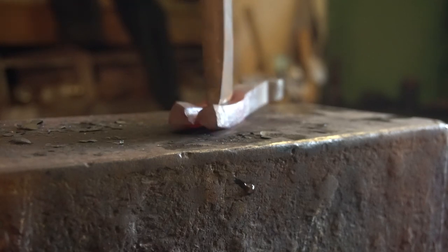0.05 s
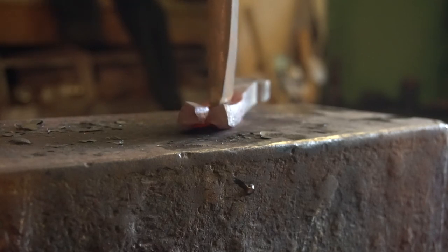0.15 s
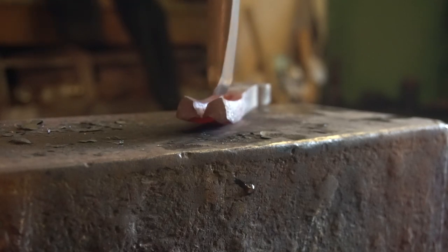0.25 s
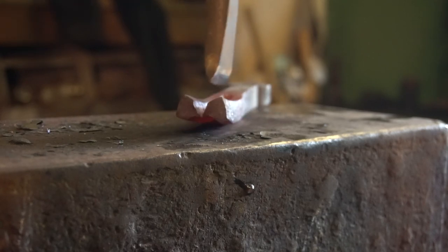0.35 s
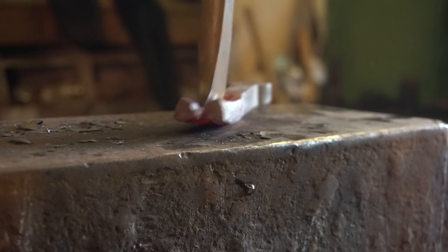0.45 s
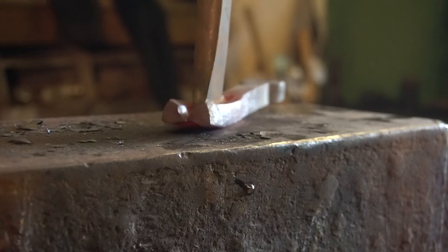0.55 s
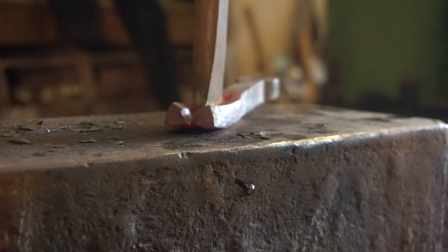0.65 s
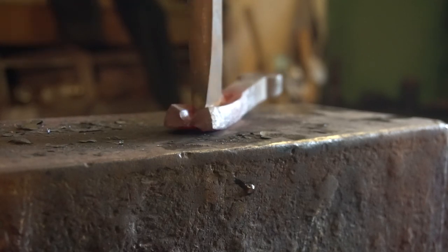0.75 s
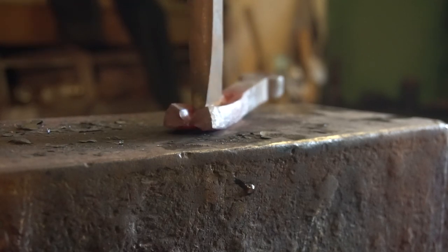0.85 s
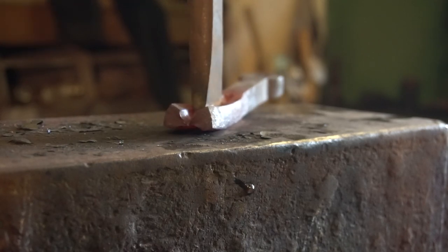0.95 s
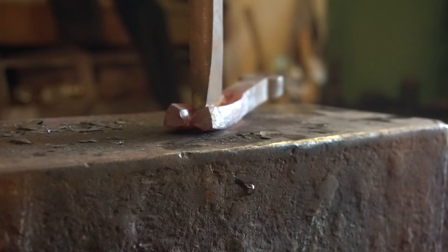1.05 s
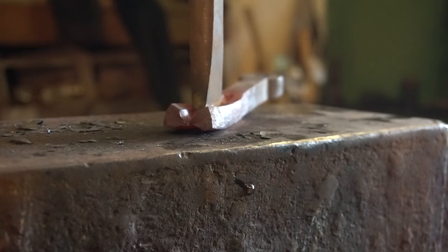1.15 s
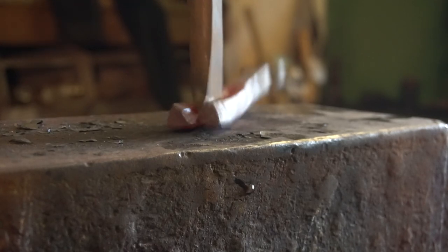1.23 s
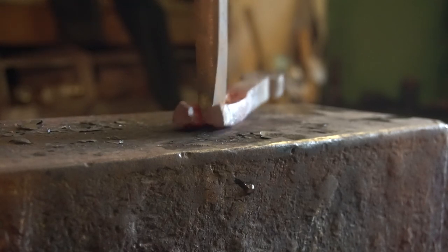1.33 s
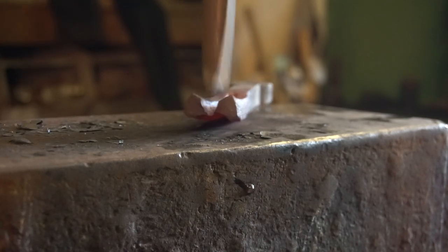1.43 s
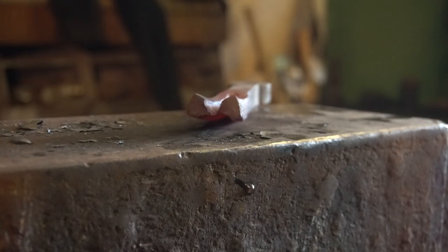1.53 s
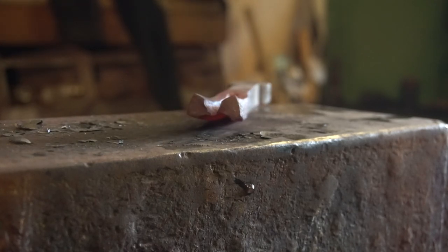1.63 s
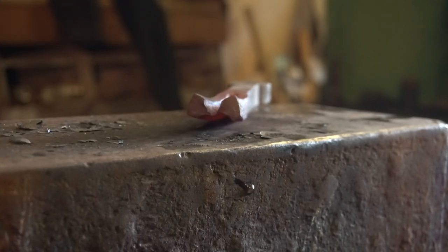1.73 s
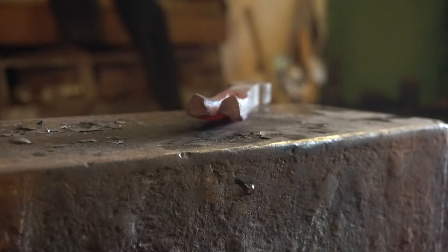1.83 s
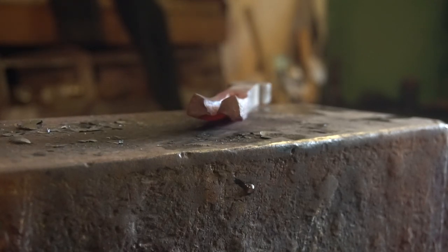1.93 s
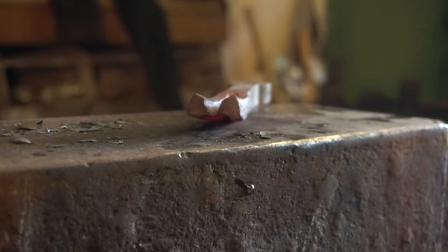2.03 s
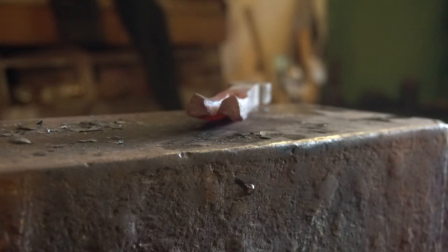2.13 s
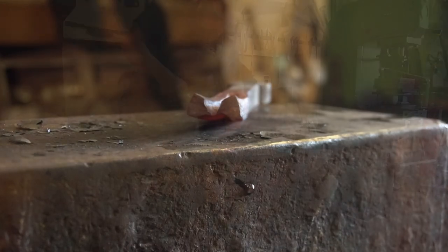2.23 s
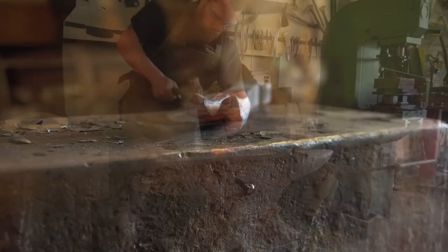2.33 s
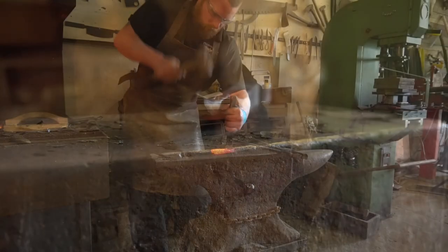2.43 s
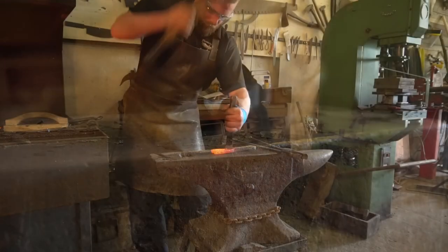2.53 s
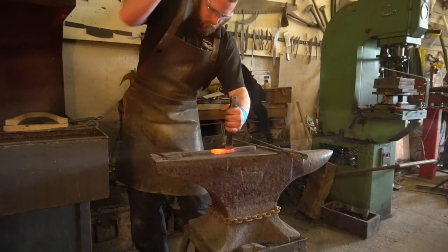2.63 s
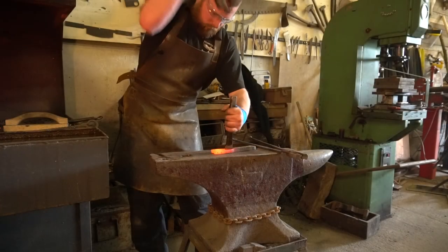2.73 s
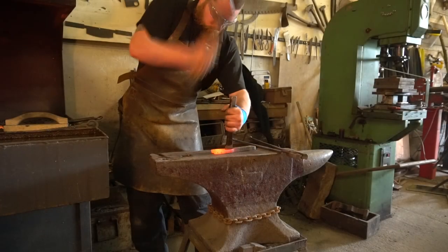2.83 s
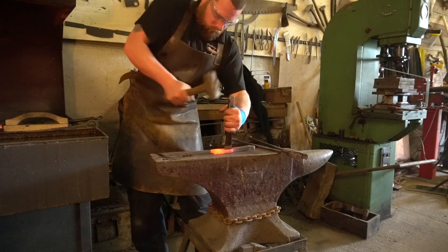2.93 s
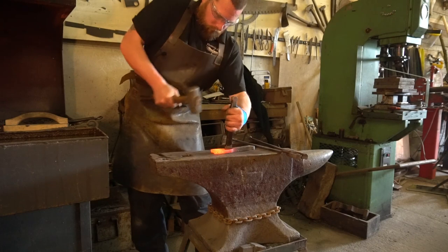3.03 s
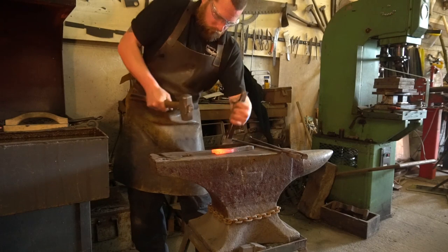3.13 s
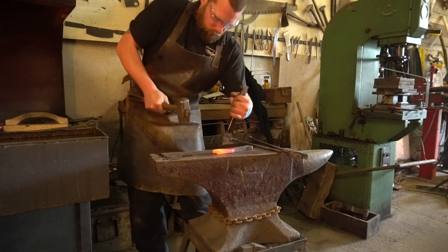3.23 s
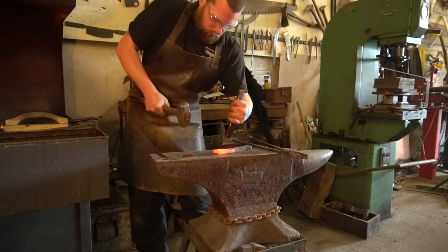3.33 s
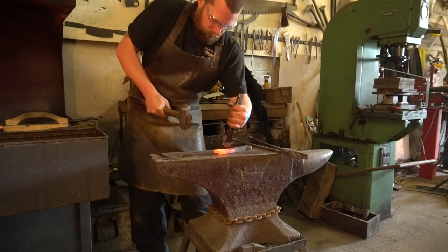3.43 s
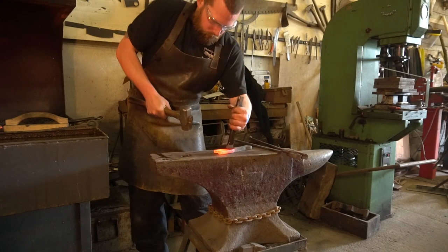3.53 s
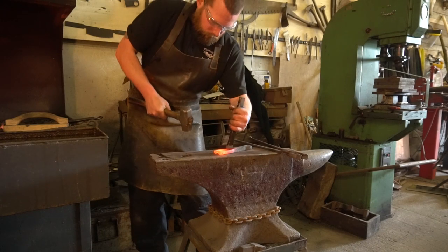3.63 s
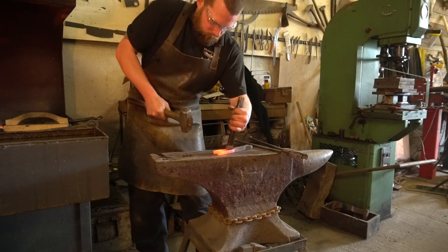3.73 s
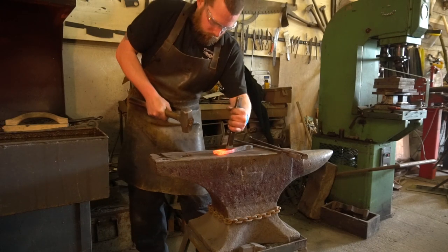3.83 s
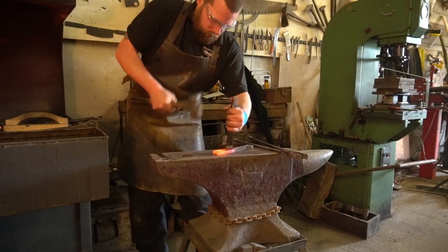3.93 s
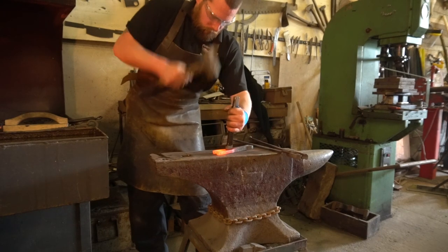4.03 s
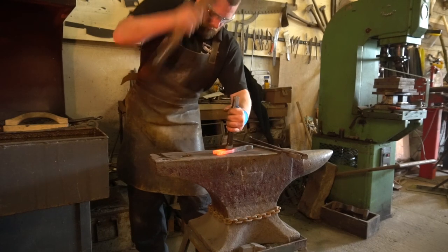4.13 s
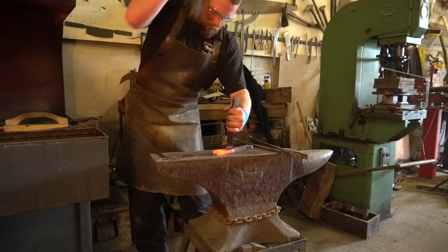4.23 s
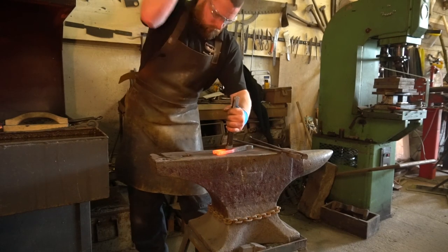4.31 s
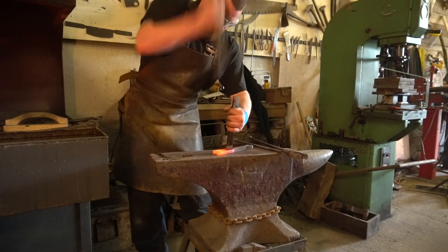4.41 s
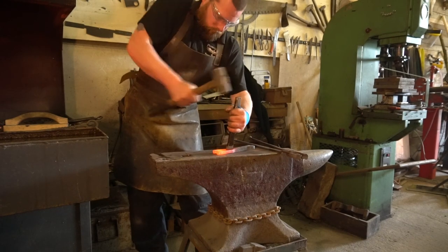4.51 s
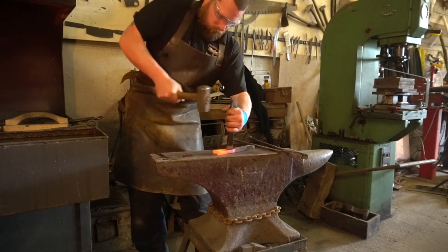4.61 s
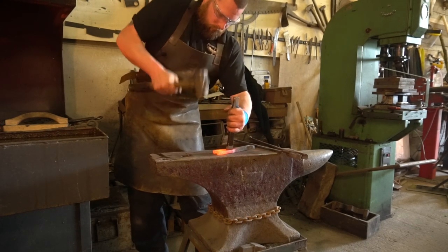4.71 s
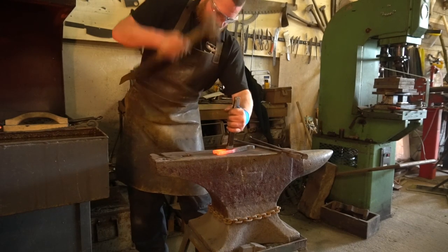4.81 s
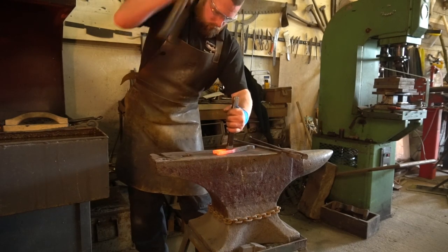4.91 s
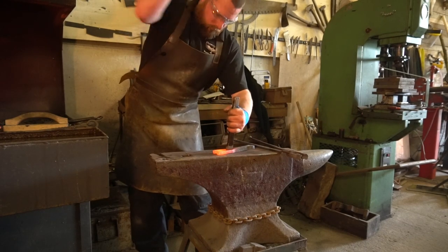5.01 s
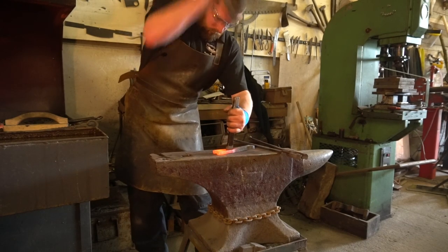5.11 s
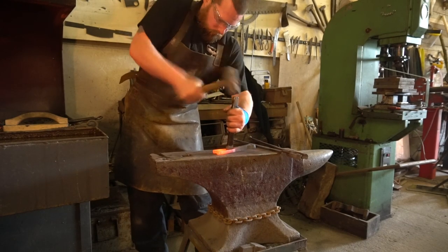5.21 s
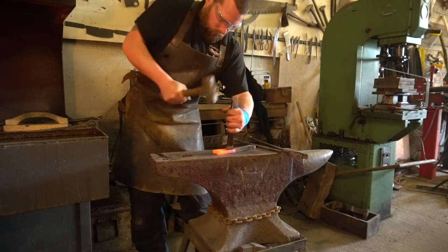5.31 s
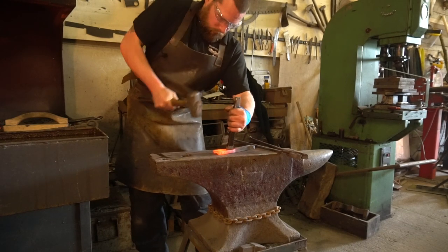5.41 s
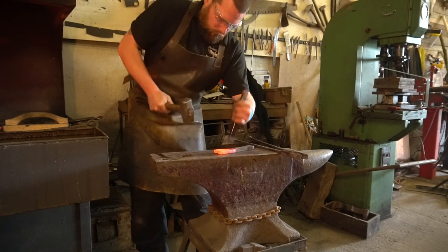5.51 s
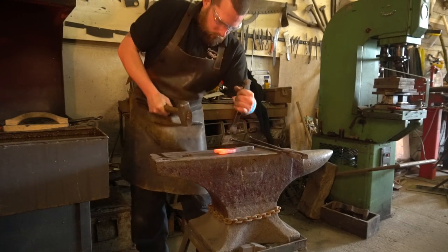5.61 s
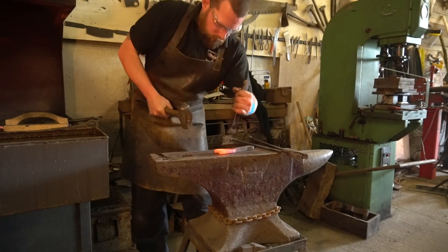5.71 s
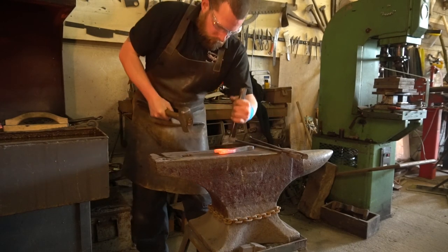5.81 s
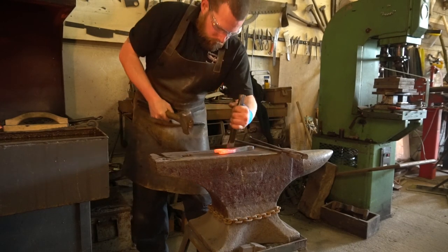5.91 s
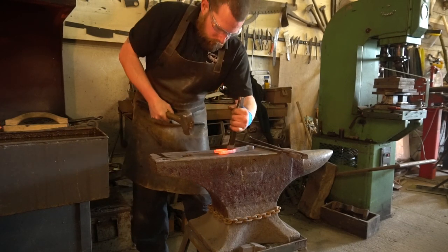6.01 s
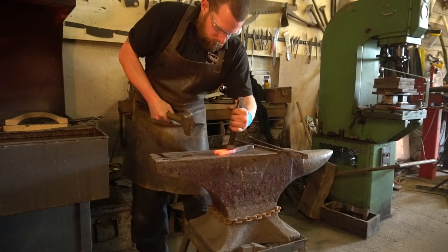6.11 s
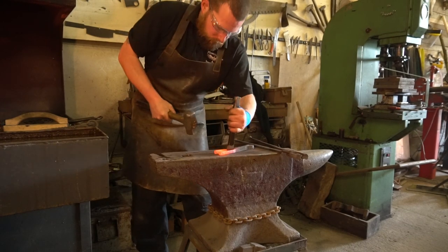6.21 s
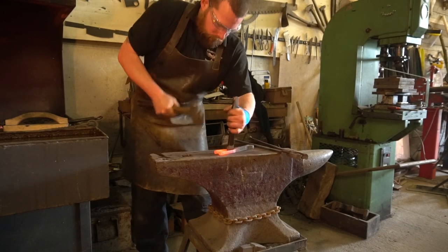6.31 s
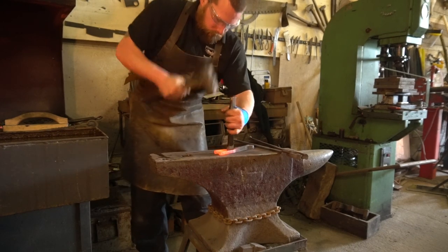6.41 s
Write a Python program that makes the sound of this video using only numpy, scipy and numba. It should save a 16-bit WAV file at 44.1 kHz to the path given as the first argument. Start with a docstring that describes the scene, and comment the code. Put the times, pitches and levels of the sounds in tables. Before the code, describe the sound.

Six loud, irregularly spaced hammer blows in a reverberant metal workshop. Each is a hard noisy crack, a short chisel clang, a burst of bright echo and a high anvil note that lingers. The first two are close and dry in background; the rest are heard farther off, over a stronger rushing, humming blower. Tool clinks, faint scrapes and fizzing scale come between. Nearly mono, peaks squashed by a limiter.

```python
"""A forge blower rushes softly, and at once the first of six hammer blows on a chisel on hot steel lands.
Each blow cracks as noise, fills the forge with fading noise and leaves the anvil singing as sine tones.
It is heard from beside the anvil, then, after a cross-fade, from across the shop, where the blower is louder.
Tools clink as short rings and hot scale sizzles as grainy noise between blows.
The blows overload the microphone and a limiter holds them down."""
import sys
import numpy as np
from scipy import signal
from scipy.fft import rfft, irfft
from scipy.io import wavfile
from scipy.ndimage import uniform_filter1d
from numba import njit

SR = 44100
rng = np.random.default_rng(int(sys.argv[2]) if len(sys.argv) > 2 else 0)


def store_wav(level_fs):
    """Save 16-bit WAV to argv[1]."""
    pcm = np.round(np.clip(np.atleast_2d(level_fs), -1, 1) * 32767)
    wavfile.write(sys.argv[1], SR, pcm.T.astype(np.int16))


N = 284807
T = np.arange(N) / SR  # time in seconds

# Colour of the scuff of tools and bar. Each row: frequency in Hz, relative level in dB per Hz.
SCUFF_COLOUR = [(700, -18), (2000, -1), (5000, -5.5), (9000, -12), (16000, -29)]
DISSOLVE_S, DISSOLVE_LENGTH_S = 2.113, 0.44  # start and length of the cross-fade between positions


def amp(db):
    """Turns decibels into a gain."""
    return 10 ** (np.asarray(db) / 20)


def unit(x):
    """Scales a sound to an average strength (rms) of 1."""
    return x / np.sqrt(np.mean(x ** 2) + 1e-20)


def read(points, hz):
    """Reads a table between its rows, along a logarithmic frequency axis."""
    f, value = np.transpose(points)
    return np.interp(np.log(hz + 1), np.log(f), value)


def add(mix, s, sound):
    """Mixes a sound in at time s, in seconds."""
    part = mix[max(round(s * SR), 0):][:len(sound)]
    part += sound[:len(part)]


def ramp(start_s, length_s):
    """Rises evenly from 0 to 1."""
    return np.clip((T - start_s) / length_s, 0, 1)


def bump(middle_s, half_s):
    """Swells smoothly to 1 at its middle and falls away again."""
    return np.exp(-((T - middle_s) / half_s) ** 2 / 2)


def noise(spectrum, size, tilt_db=0):
    """Coloured noise of rms 1, its part above 1000 Hz tilted by some dB per octave."""
    hz = np.fft.rfftfreq(size, 1 / SR)
    octaves = np.log2(np.maximum(hz, 1000) / 1000)
    colour = amp(read(spectrum, hz) + tilt_db * octaves)
    return unit(irfft(rfft(rng.standard_normal(size)) * colour, size))


def wander(rate_hz, size):
    """Slow random drift of rms 1, made by keeping only the low frequencies of noise."""
    hz = np.fft.rfftfreq(size, 1 / SR)
    slow = rfft(rng.standard_normal(size)) / (1 + (hz / rate_hz) ** 4)
    return unit(irfft(slow, size))


def shimmer(hz, depth, rate_hz):
    """One second of a tone that flutters as its reflections cross."""
    phasor = 1 + depth * (wander(rate_hz, SR) + 1j * wander(rate_hz, SR))
    turns = hz * T[:SR] + rng.random()
    return unit((phasor * np.exp(2j * np.pi * turns)).real)


def die_away(x):
    """Lets each frequency band of a noise die at the pace it has in the shop."""
    # Each row: frequency in Hz, time to fall by 60 dB in seconds.
    shop_decay = [(60, 1), (300, 0.83), (1000, 0.66), (2200, 0.91), (4000, 0.7), (8000, 0.42),
                  (15000, 0.16)]
    hz, t, bands = signal.stft(x, SR, nperseg=512)
    fall = amp(-60 * t / read(shop_decay, hz)[:, None])
    return signal.istft(bands * fall, SR, nperseg=512)[1][:len(x)]


def blower(near, drift_hz=1.8, gust_db=0.54):
    """The forge blower: rushing, slightly uneven air as noise, and the fan's whine as a wavering tone."""
    # Colour of the air from each position. Each row: frequency in Hz, relative level in dB per Hz.
    air_beside, air_across = [(15, -39), (25, 7), (185, -6), (394, -2), (451, -10), (516, -2.5),
                              (1040, -4.5), (1130, -10), (1260, -12), (1480, -10), (1840, -16),
                              (7510, -28.5), (16000, -38.5)], [(25, 4), (60, -0.5), (120, -5), (210, 1.5), (450, -4),
                                                (750, -0.5), (1100, -8.5), (1300, -11), (2200, -16.5),
                                                (3500, -22.5), (7000, -25), (10000, -31), (13000, -47),
                                                (16000, -46)]
    colour, air_db, whine_db = (air_beside, -55.5, -62) if near else (air_across, -44.5, -50)
    whine_hz, whine_waver_db = 1148.3, 1.2
    turns = np.cumsum(whine_hz + drift_hz * wander(19, N)) / SR
    whine_level = amp(whine_db + whine_waver_db * wander(20, N))
    whine = np.sqrt(2) * whine_level * np.sin(2 * np.pi * turns)
    air = amp(air_db + gust_db * wander(6.2, N)) * noise(colour, N)
    # beside the anvil it grows louder just before the cross-fade
    swell_s, swell_rise_s, swell_db = 1.81, 0.32, 6.5
    return (air + whine) * amp(near * swell_db * ramp(swell_s, swell_rise_s))


def hum(near_db=-9, drift_hz=2, waver_db=3):
    """Low tones of the blower's motor and casing, unsteady in pitch and level, stronger across the shop."""
    # Each row: frequency in Hz, level in dB before the position lowers it.
    hum_tones = [(49.5, -67), (97, -51.5), (143, -56.5), (208, -55), (291, -56)]
    tones = np.zeros(N)
    for hz, db in hum_tones:
        level = amp(db + waver_db * wander(4.2, N))
        turns = np.cumsum(hz + drift_hz * wander(8.3, N)) / SR
        tones += level * np.sin(2 * np.pi * turns)
    # one and a half times near_db beside the anvil, half of it across the shop
    return tones * amp(near_db * (1.5 - ramp(DISSOLVE_S, DISSOLVE_LENGTH_S)))


def scale(snap_t60=0.0045, grains_per_s=160, grain_db=-3):
    """Hot scale: noise hisses with tiny bursts and flares up once; flakes snap off as sharp noise bursts."""
    # Each row: time in seconds, starting level in dB.
    flake_snaps = [(3.904, -35.5), (3.985, -30.5), (4.1777, -33), (4.3313, -32), (4.3666, -30.5),
                   (6.341, -37), (6.373, -38)]
    # Each row: frequency in Hz, relative level in dB per Hz.
    fizz_colour = [(500, -37.5), (2000, 13), (3200, 2), (5000, 6.5), (9000, -10), (13000, 0),
                   (16000, -13.5)]
    t = T[:SR // 20]
    strengths = amp(4.5 * np.minimum(rng.exponential(1, N), 4))
    sparks = (rng.random(N) < grains_per_s / SR) * strengths
    burst = noise(fizz_colour, len(t)) * amp(-60 * t / .003)
    grains = unit(signal.oaconvolve(sparks, burst)[:N])

    far = ramp(DISSOLVE_S, DISSOLVE_LENGTH_S)
    hiss_near_db, hiss_far_db, flare_db = -80, -64, -58
    # the flare comes as the chisel is set anew
    flare_s, rise_s, hold_s, fall_s = 3.87, 0.21, .55, .45
    flare = ramp(flare_s, rise_s) - ramp(flare_s + rise_s + hold_s, fall_s)
    level = amp(hiss_near_db) * (1 - far) + amp(hiss_far_db) * far + amp(flare_db) * flare
    out = level * (noise(fizz_colour, N) + amp(grain_db) * grains)
    for s, db in flake_snaps:
        add(out, s, noise(fizz_colour, len(t)) * amp(db - 60 * t / snap_t60))
    return out


def blows(near):
    """The blows heard from one position: those before move_s from beside the anvil, the rest from afar."""
    # Each row: start in seconds, crack level in dB, room clatter level in dB, ring level in dB,
    # anvil note level in dB, brightness in dB per octave, most excited frequency in Hz, its boost in dB,
    # chisel frequency in Hz, chisel level in dB, seconds until the tools press on the anvil,
    # damping they then add in dB per second.
    blow_rows = [(0.0235, -4, -9, -17.5, -17.5, 0.5, 7523, 5, 4560, -7.5, 0.52, 16),
                 (1.3057, -7.5, -8, -21.5, -22, 0.5, 4275, 13.5, 4580, -5, .9, 12.5),
                 (2.2399, 10.5, -9.5, -30.5, -24, 3, 1713, 21.5, 7290, -13.5, 0.32, 46),
                 (2.9492, 0.5, -10.5, -22, -22.5, 1, 9940, 10, 4570, -19, 0.45, 22),
                 (4.5648, 0.5, -11.5, -21, -25, 0.5, 5770, 11, 3790, -22, 0.27, 38),
                 (5.2898, -1.5, -10, -22, -22, 1.5, 3660, 7, 4400, -18.5, 0.44, 25)]
    move_s = 2.1
    return [row for row in blow_rows if (row[0] < move_s) == near]


def crowd_of_modes():
    """Gain per Hz of the many weak steel modes above the anvil's note: narrow random peaks."""
    ripple = rng.standard_normal(SR // 2 + 1)
    for _ in range(2):
        ripple = uniform_filter1d(ripple, size=45)
    # the peaks stand out more towards 3000 Hz
    contrast = np.interp(np.arange(len(ripple)), [1400, 3000], [1, 2.8])
    return unit(amp(contrast * unit(ripple)))


def overtones(near, tilt_db, strong_hz, boost_db, rise_s=0.0042):
    """Steel modes of anvil and tools; the spot struck favours some, and low ones build up more slowly."""
    # Each row: frequency in Hz, relative level in dB beside the anvil, relative level in dB across the shop,
    # time to fall by 60 dB in seconds.
    steel_modes = [(1291, -20, -14, .8), (1713, -8, -4, .62), (2130, -24, -12, .5), (2630, -11, -19, .55),
                   (2735, -14, -21, .8), (3271, -7, -12, .75), (3586, -13, 0, .47), (3968, -17, -6, .45),
                   (4077, -17, -5, .5), (4349, -3, 0, .6), (4557, 1, -4, .62), (5543, -13, -12, .5),
                   (5908, -6, -7, .5), (6051, -10, -13, .56), (6598, -9, -10, .5), (7523, -3, -9, .53),
                   (8470, -14, -24, .3), (8896, -14, -14, .48), (10226, -27, -14, .6),
                   (10499, -19, -16, .72), (10758, -28, -19, .68), (11950, -15, -27, .35),
                   (12704, -29, -19, .58), (13868, -26, -15, .56), (14997, -23, -36, .33),
                   (15633, -28, -18, .6)]
    flutter, flutter_hz = .28, 10
    t, out = T[:SR], np.zeros(SR)
    for hz, near_db, far_db, t60 in steel_modes:
        favoured = np.exp(-(np.log(hz / strong_hz) / .035) ** 2)
        db = (near_db if near else far_db) + tilt_db * np.log2(hz / 4000) + boost_db * favoured
        rise = 1 - np.exp(-t / rise_s * (hz / 4000) ** 2)
        out += amp(db - 60 * t / t60) * shimmer(hz, flutter, flutter_hz) * rise
    return out


def hammer(near, crack_t60=0.058, fill_s=0.0054, chisel_t60=0.19, chisel_flutter=0.55, chisel_width_hz=35):
    """Each blow: a hard crack, the chisel's short clang, the shop's dense echo, and ringing steel."""
    # Colours of crack and echo. Each row: frequency in Hz, relative level in dB per Hz.
    crack_colour = [(30, 14.5), (120, -20.5), (330, 0), (700, -8.5), (1400, -10.5), (2500, -8),
                    (4200, -5.5), (7000, -12), (11000, -25.5), (16000, -18.5)]
    clatter_beside, clatter_across = [(30, -2), (150, -10), (330, -5), (800, -3.5), (1400, -8.5),
                                      (2400, -9.5), (3400, -4.5), (4500, -2), (6000, -3), (8000, -5),
                                      (11000, -3.5), (16000, 2)], [(30, 14.5), (150, 3.5), (270, 3.5), (340, 14.5),
                                                            (440, 10), (800, 10), (1300, 2), (1700, 9),
                                                            (2150, 11.5), (2800, 9), (3700, 11.5),
                                                            (5000, 7.5), (7000, 7.5), (10000, -3),
                                                            (16000, 4.5)]
    clatter_colour = clatter_beside if near else clatter_across
    t, out, crowd = T[:SR], np.zeros(N), crowd_of_modes()
    for row in blows(near):
        s, crack_db, clatter_db, ring_db, _, tilt_db, strong_hz, boost_db, chisel_hz, chisel_db, *_ = row
        crack = noise(crack_colour, SR, tilt_db) * amp(crack_db - 60 * t / crack_t60)
        chisel_tone = shimmer(chisel_hz, chisel_flutter, chisel_width_hz)
        clang = chisel_tone * amp(chisel_db - 60 * t / chisel_t60)
        wash = irfft(rfft(noise(clatter_colour, SR, tilt_db)) * crowd, SR)
        clatter = amp(clatter_db) * die_away(wash) * (1 - np.exp(-t / fill_s))
        ring = amp(ring_db) * overtones(near, tilt_db, strong_hz, boost_db)
        add(out, s, crack + clang + clatter + ring)
    return out


def anvil_note(near, swell_s=0.014, direct=0.21):
    """The anvil's lowest, longest mode: a sine that starts anew at each blow and swells as the room fills.

    It dies faster once the tools press on the anvil.
    """
    note_hz, free_fall_db_per_s, waver_db = 1468.5, 23, .5
    # the shop's first returns reinforce the note for a moment
    pile_up_s, pile_up_half_s, pile_up_peak_db = .125, .025, 4
    out = np.zeros(N)
    for s, _, _, _, note_db, *_, press_s, damping in blows(near):
        start = round(s * SR)
        t = T[:N - start]
        swell = 1 - (1 - direct) * np.exp(-t / swell_s)
        pile_up_db = pile_up_peak_db * np.exp(-((t - pile_up_s) / pile_up_half_s) ** 2 / 2)
        lost_db = free_fall_db_per_s * t + damping * np.maximum(t - press_s, 0)
        tone = np.sin(2 * np.pi * note_hz * t)
        out[start:] = amp(note_db + pile_up_db - lost_db) * swell * tone  # replaces the older note
    return np.sqrt(2) * out * amp(waver_db * wander(18, N))


def thuds():
    """Short low bumps through the anvil's stand: a few swings of a deep tone that swell and fade."""
    # Each row: middle in seconds, peak level in dB, frequency in Hz, half length in seconds.
    stand_bumps = [(0.028, -14, 49, 0.0041), (1.5, -26.5, 46, 0.009), (2.258, -39, 50, 0.013),
                   (5.294, -39, 55, 0.0068)]
    out = np.zeros(N)
    for s, db, hz, half_s in stand_bumps:
        out -= amp(db) * bump(s, half_s) * np.cos(2 * np.pi * hz * (T - s))
    return out


def clinks(tick_db=-6):
    """Chisel and tongs, damped by the hand, touch the work: a short ring of sines and a shorter scuff."""
    # Each row: start in seconds, level in dB, time for the ring to fall by 60 dB in seconds,
    # strongest frequency in Hz.
    tool_touches = [(0.5324, -29.5, 0.064, 4596), (.563, -56, 0.046, 4560), (.570, -43, 0.028, 4540),
                    (0.612, -57, 0.088, 4600), (0.711, -56, 0.028, 5570), (0.842, -47, 0.027, 3534),
                    (0.873, -48, 0.034, 2185), (1.752, -64, 0.035, 7400), (2.7345, -52, 0.088, 2250),
                    (3.6174, -45.5, 0.041, 4630), (3.697, -54, 0.043, 4710), (3.913, -50, .04, 2200),
                    (4.137, -41, 0.035, 2190), (4.158, -41, .035, 2210), (6.0866, -35, 0.02, 4780)]
    # The tools' modes. Each row: multiple of the strongest frequency, relative level in dB.
    tool_modes = [(.388, -3), (.597, -8), (.952, -8), (1, 0), (1.514, -14), (1.856, -12)]
    scuff_share = .4  # length of the scuff as a share of the ring's
    t, out = T[:SR // 4], np.zeros(N)
    for s, db, t60, hz in tool_touches:
        ring = np.zeros(len(t))
        for ratio, level_db in tool_modes:
            ring += amp(level_db) * np.sin(2 * np.pi * (hz * ratio * t + rng.random()))
        scuff = noise(SCUFF_COLOUR, len(t)) * amp(tick_db - 60 * t / (scuff_share * t60))
        add(out, s, amp(db) * (ring * amp(-60 * t / t60) + scuff))
    return out


def scrapes():
    """The bar is shifted on the anvil's face: grit heard as soft swells of noise."""
    # Each row: middle in seconds, peak level in dB, half length in seconds.
    bar_slides = [(1.092, -63, 0.014), (1.974, -60.5, 0.1), (2.214, -45.5, 0.011)]
    level = sum(amp(db) * bump(s, half_s) for s, db, half_s in bar_slides)
    return noise(SCUFF_COLOUR, N) * level


def soft_clip(x, ceiling_db):
    """Smoothly flattens what goes over the ceiling."""
    return x / (1 + (x / amp(ceiling_db)) ** 6) ** (1 / 6)


@njit
def follow(x, attack, release):
    """Follows the peaks of a signal: quick up, slow down."""
    out, level = np.empty(len(x)), 0.
    for i in range(len(x)):
        level += (x[i] - level) * (attack if x[i] > level else release)
        out[i] = level
    return out


def limiter(x, overload_db=-6.0, limit_db=-11.5, attack_s=0.0001, release_s=0.16, ease_s=0.0029):
    """The microphone overloads, and a limiter pulls the gain down within a few ms."""
    clipped = soft_clip(x, overload_db)
    peak = follow(abs(clipped), min(1 / (attack_s * SR), 1), 1 / (release_s * SR))
    over_db = np.maximum(20 * np.log10(peak + 1e-9) - limit_db, 0)
    pole = np.exp(-1 / (ease_s * SR))
    eased_db = signal.lfilter([1 - pole], [1, -pole], over_db)
    return clipped * amp(-eased_db)


def scene(wet_db=-14, side_db=-29):
    """Cross-fades the two limited listening positions into nearly mono stereo, a shade louder on the right."""
    small = clinks() + scrapes() + scale()
    echo = die_away(rng.standard_normal(SR))
    echoed = signal.fftconvolve(small, echo / np.linalg.norm(echo))[:N]
    small = small + amp(wet_db) * echoed + thuds() + hum()

    beside = limiter(hammer(True) + anvil_note(True) + blower(True) + small)
    across = limiter(hammer(False) + anvil_note(False) + blower(False) + small)
    far = ramp(DISSOLVE_S, DISSOLVE_LENGTH_S)
    near_gain_db = -0.5  # the sound from beside the anvil is mixed a little lower
    mid = amp(near_gain_db) * (1 - far) * beside + far * across

    # a 5 ms burst of random echoes, added left and subtracted right, gives a little width
    early = rng.standard_normal(SR // 200)
    side = amp(side_db) * signal.oaconvolve(mid, early / np.linalg.norm(early))[:N]
    return np.array([mid + side, mid - side]) * amp([[-.25], [.25]])


def record(dry, low_cut_hz=32):
    """Cuts the deepest rumble, holds the peaks under a soft ceiling and removes the highest treble."""
    low_cut = signal.butter(2, low_cut_hz, "high", fs=SR, output="sos")
    held = soft_clip(signal.sosfilt(low_cut, dry), -6.5)
    edge_hz = 16000
    treble_cut = signal.firwin(255, edge_hz, window=("kaiser", 8), fs=SR)
    return signal.oaconvolve(held, treble_cut[None], "same")


dry = scene()
out = record(dry)
store_wav(out)
```